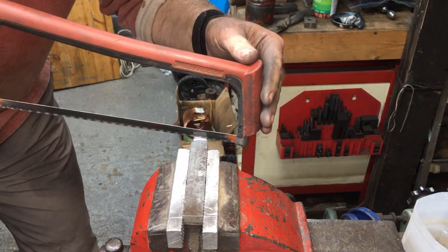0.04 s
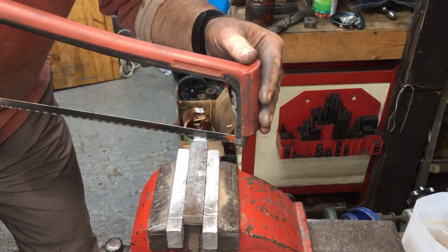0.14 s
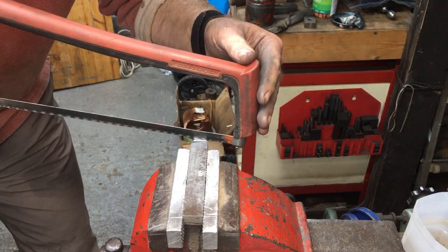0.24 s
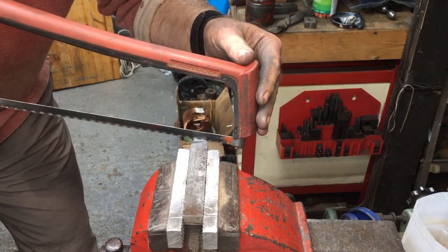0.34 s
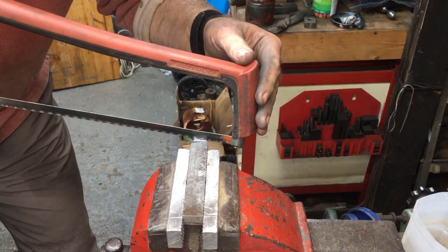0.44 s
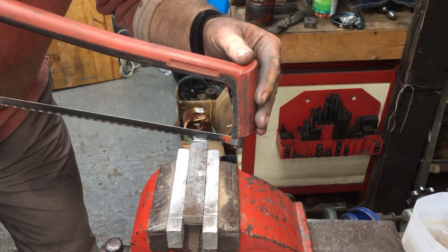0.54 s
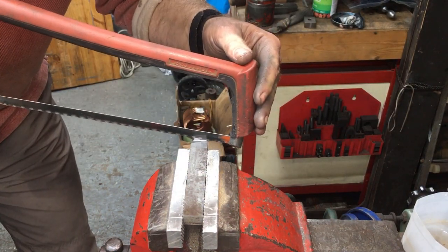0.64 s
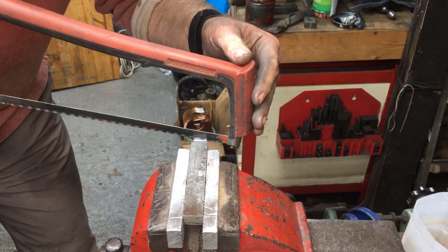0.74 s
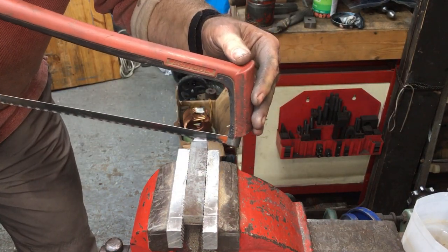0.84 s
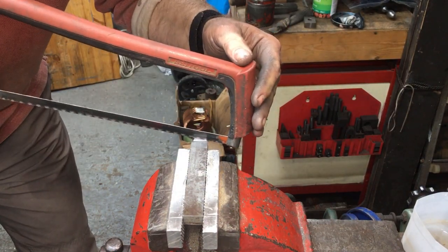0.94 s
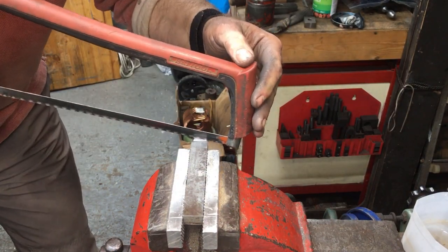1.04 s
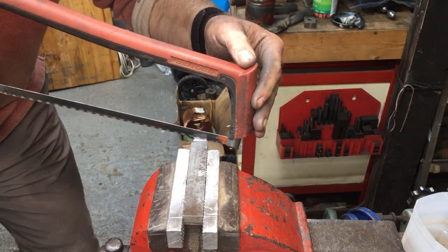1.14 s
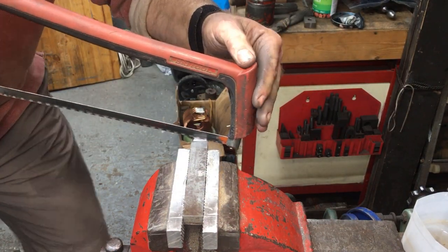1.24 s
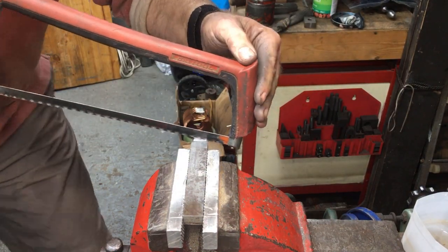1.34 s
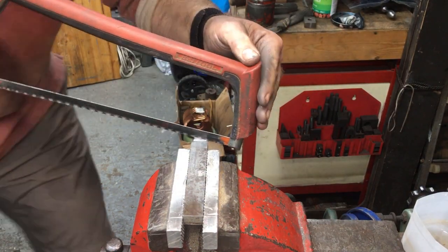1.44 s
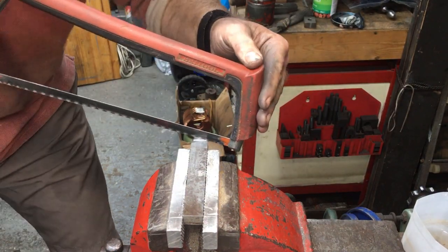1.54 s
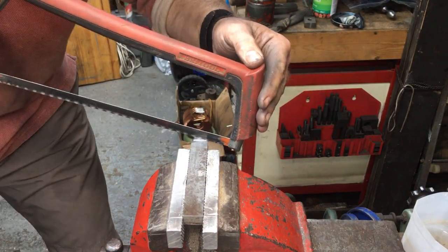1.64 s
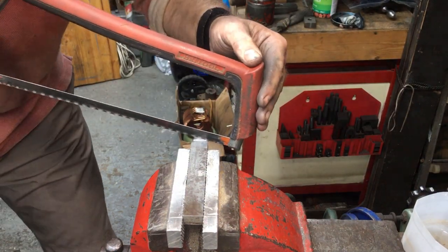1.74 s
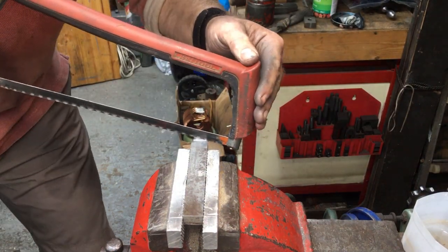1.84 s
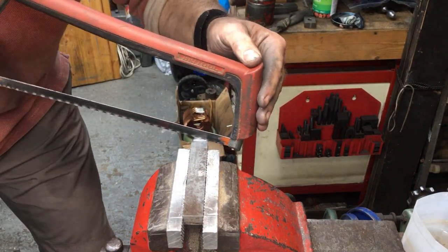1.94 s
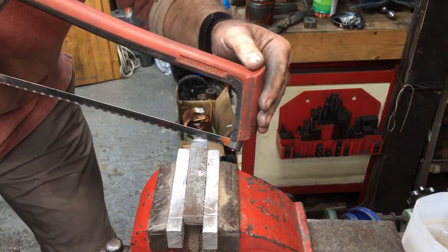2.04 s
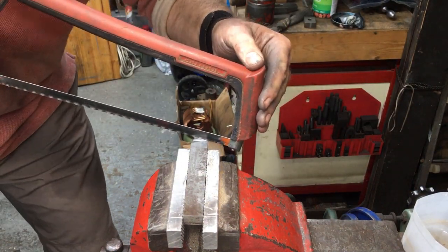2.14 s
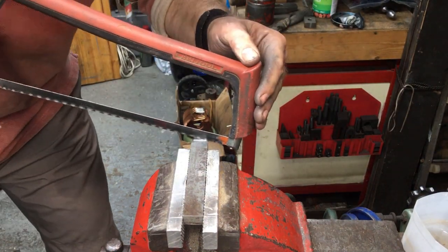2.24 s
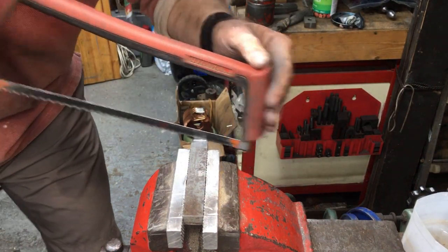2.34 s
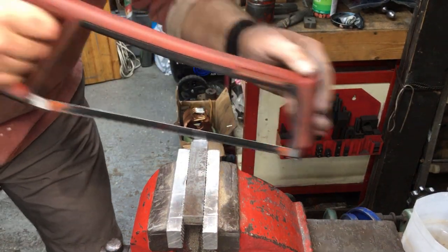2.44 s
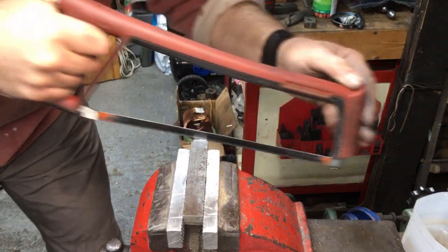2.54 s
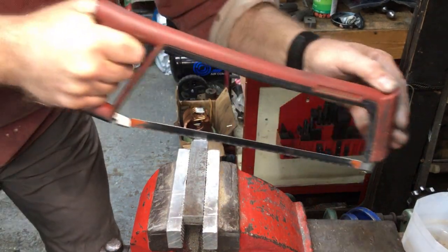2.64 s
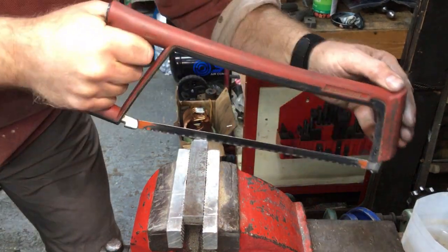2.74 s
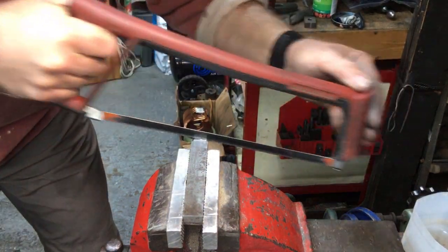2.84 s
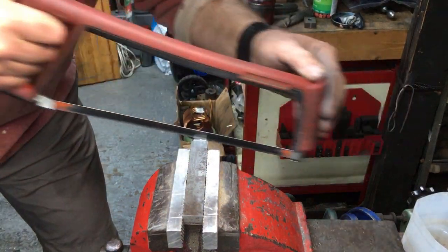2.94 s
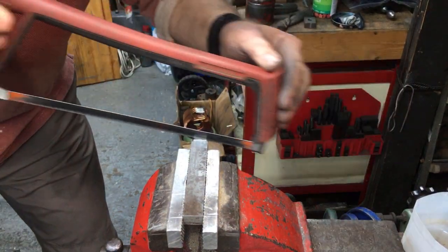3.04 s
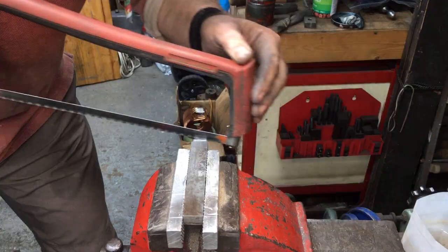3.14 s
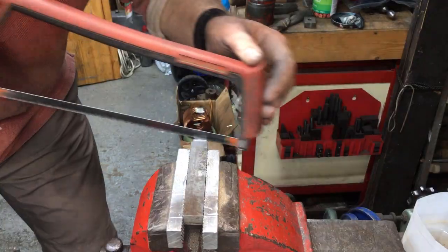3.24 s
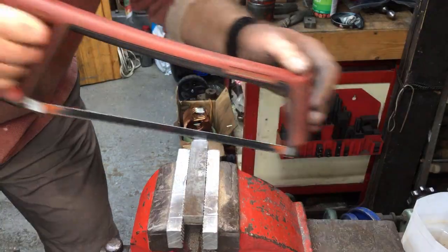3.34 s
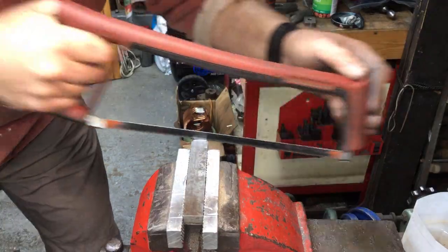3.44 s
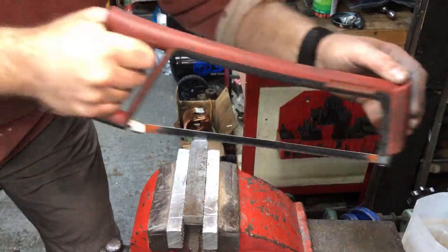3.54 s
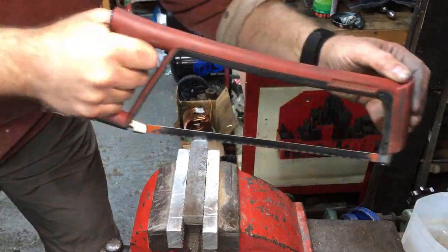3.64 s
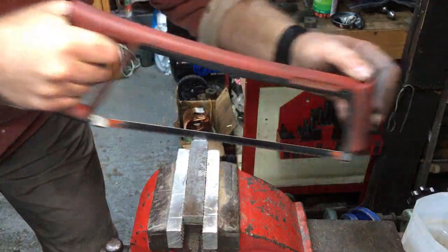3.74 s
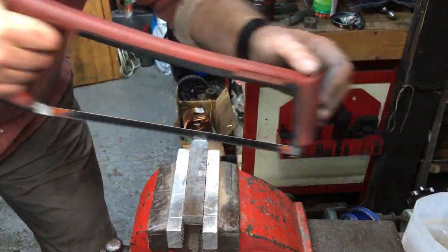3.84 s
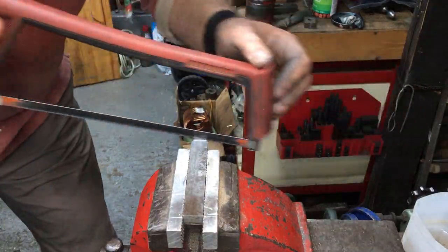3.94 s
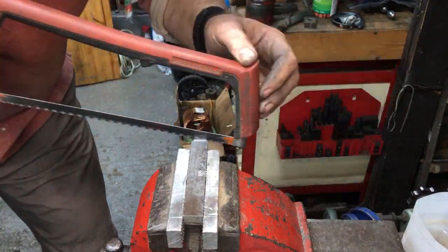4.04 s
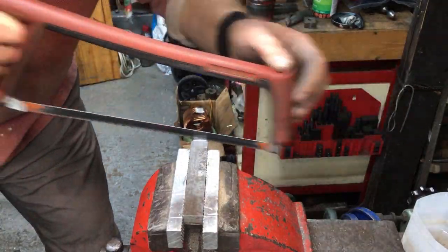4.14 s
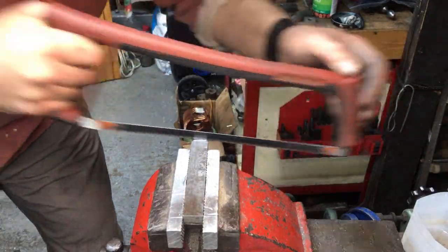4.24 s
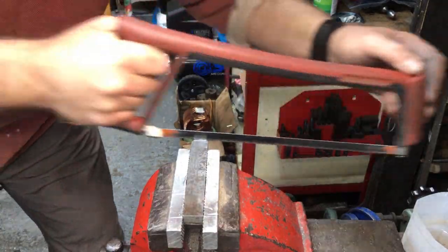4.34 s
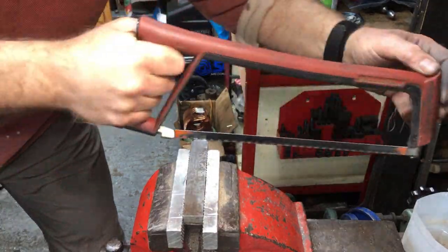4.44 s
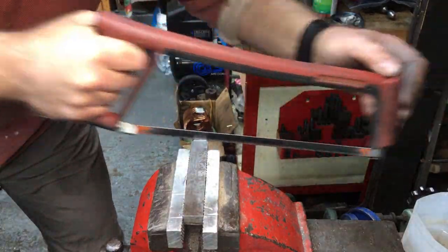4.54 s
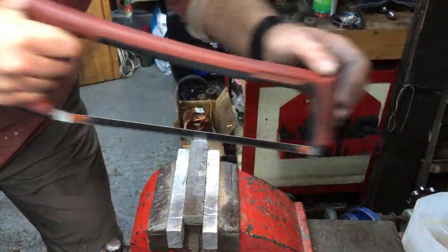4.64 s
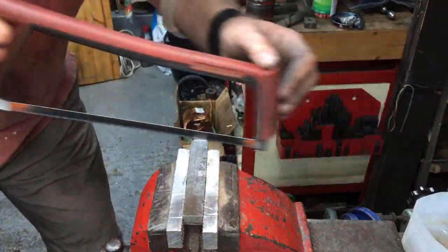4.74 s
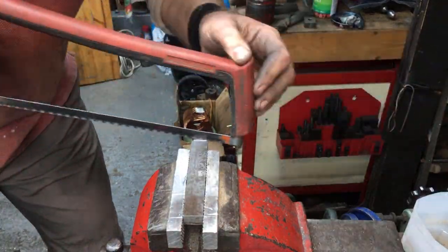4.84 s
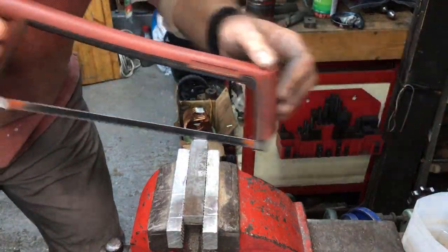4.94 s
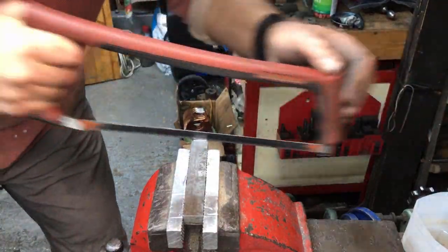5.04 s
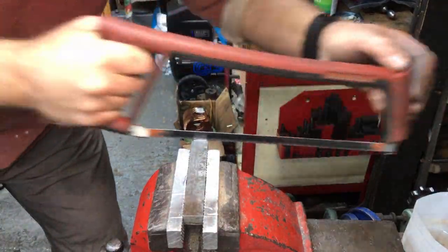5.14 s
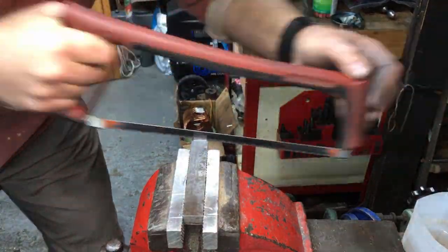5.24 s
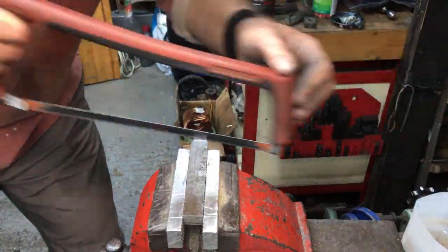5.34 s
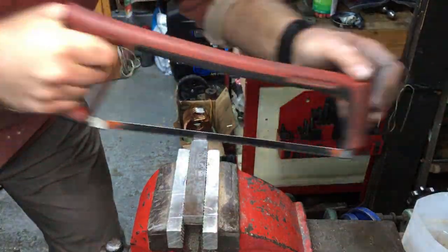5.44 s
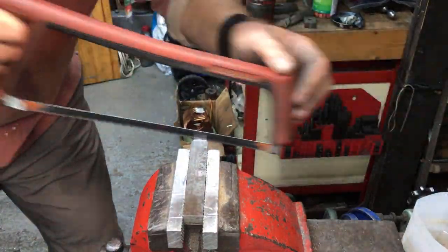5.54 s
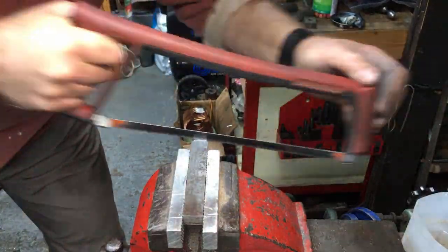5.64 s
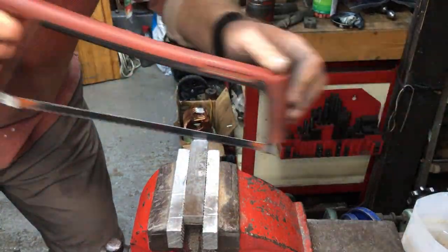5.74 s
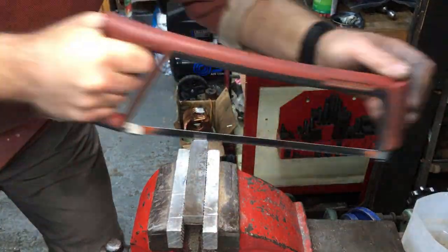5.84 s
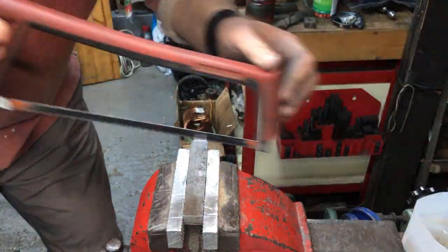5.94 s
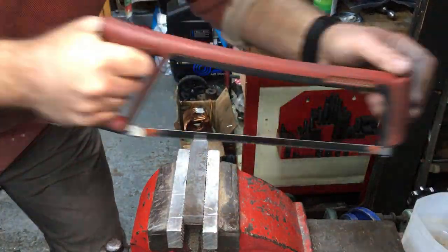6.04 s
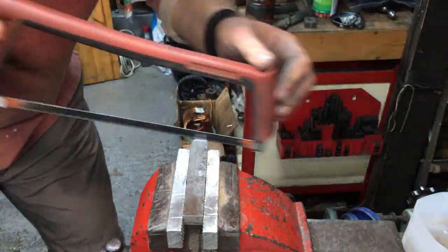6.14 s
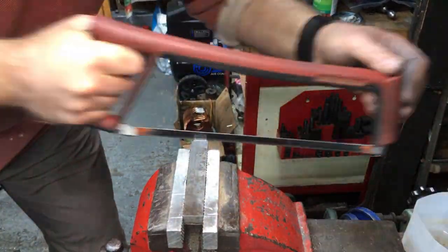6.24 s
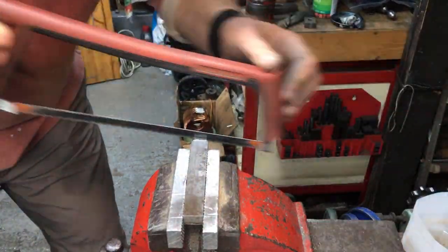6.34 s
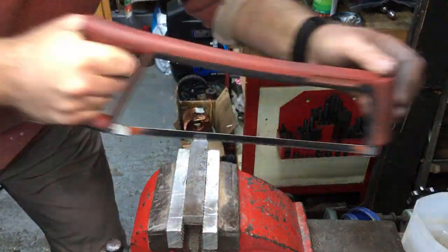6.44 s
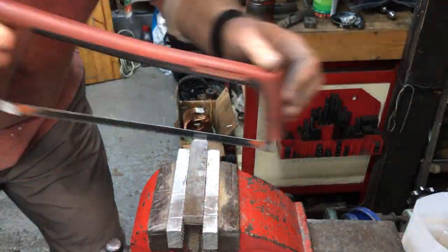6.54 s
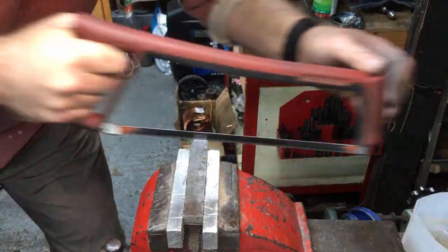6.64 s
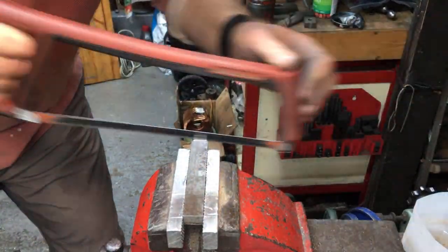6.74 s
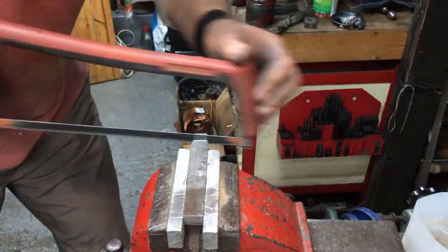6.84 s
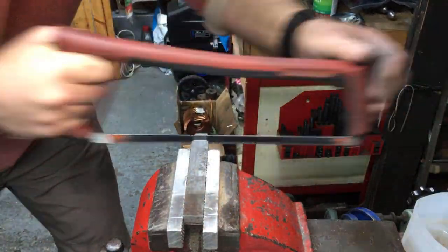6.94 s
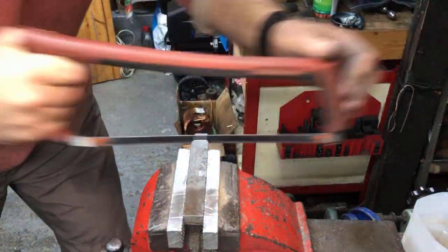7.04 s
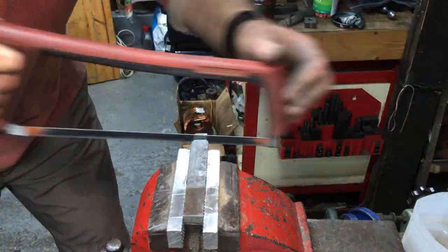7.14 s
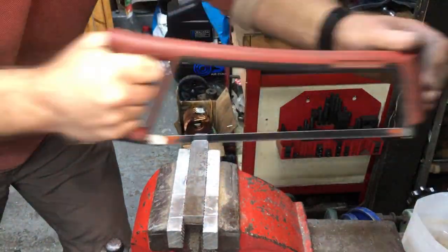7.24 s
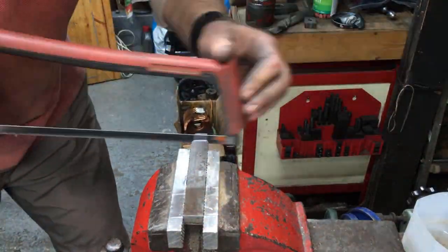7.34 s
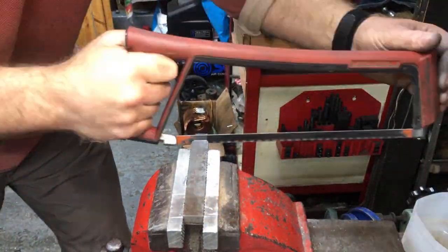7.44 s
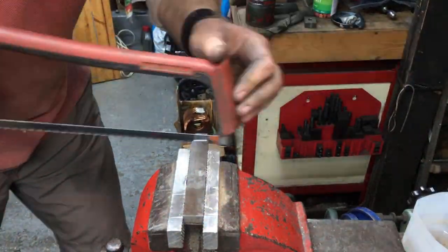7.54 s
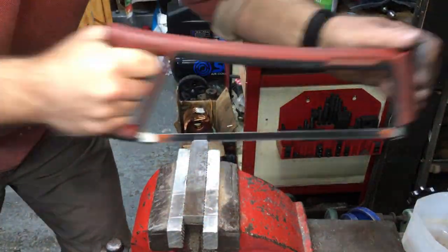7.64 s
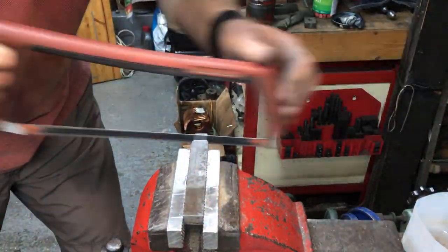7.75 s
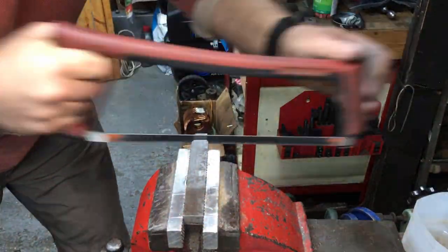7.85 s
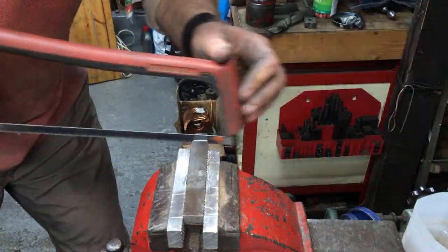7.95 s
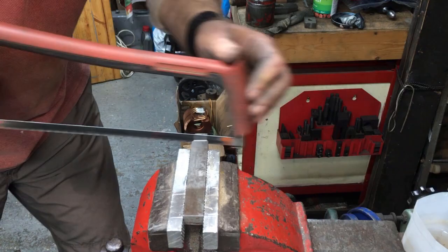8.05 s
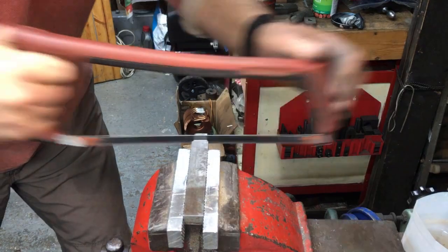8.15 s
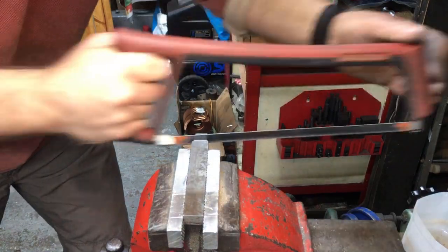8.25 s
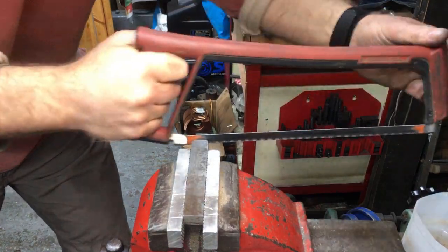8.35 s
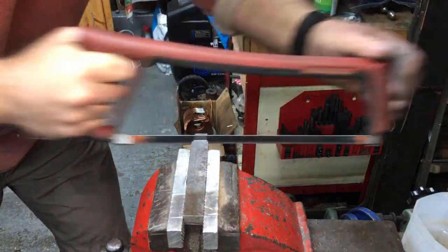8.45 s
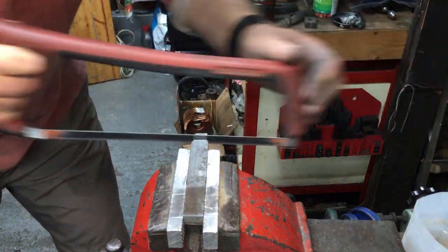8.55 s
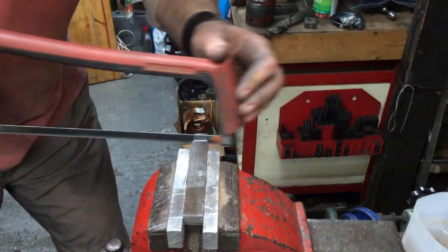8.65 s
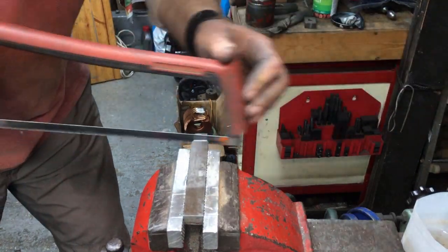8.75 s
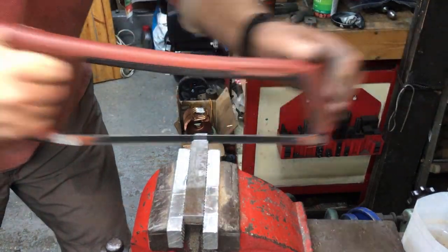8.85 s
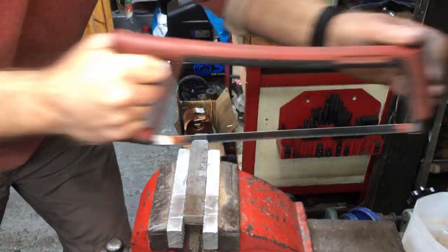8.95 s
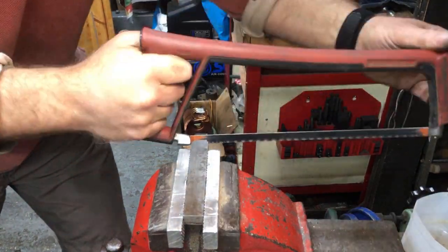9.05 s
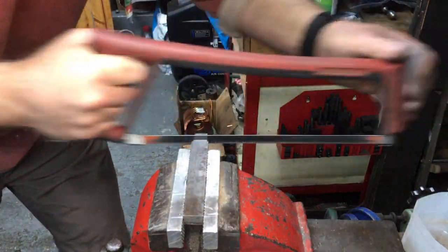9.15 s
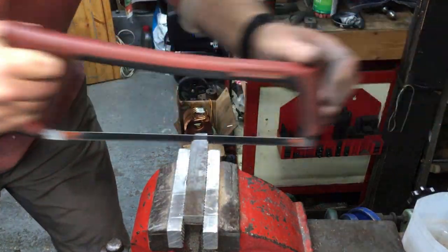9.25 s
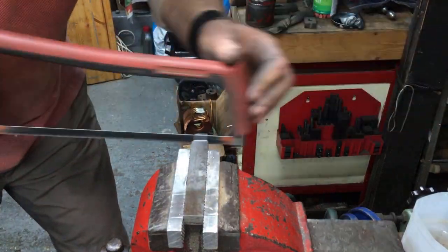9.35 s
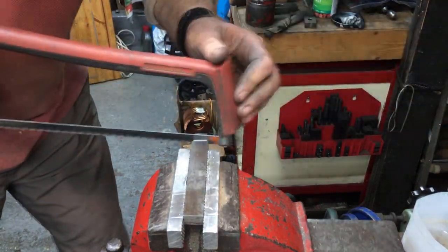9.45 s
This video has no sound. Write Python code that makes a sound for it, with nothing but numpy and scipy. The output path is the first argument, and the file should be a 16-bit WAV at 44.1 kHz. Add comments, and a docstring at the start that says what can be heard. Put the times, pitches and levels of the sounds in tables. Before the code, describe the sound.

Faint, low workshop air runs throughout. At 0 s a hacksaw blade taps the clamped steel with a soft low thud; light gritty drags follow around 0.4 and 0.8 s. From 1.3 to 2.3 s come more taps, thin scrapes, low bench thuds and a run of very faint ticks. At about 2.35 s sawing starts: harsh, toothy push and pull strokes of roughly 0.45 s each, loud at mid-stroke and dipping at the turns, with gliding blade resonances, occasional hard snags and brief faint singing tones. From 5.25 to 7.9 s the sound is time-lapsed: about ten strokes per second, four times higher, a frantic hissy zipping that gradually brightens. Normal speed returns near 7.9 s with about four slower, brighter, fuller strokes, short squeaks near 8.2, 8.6 and 8.9 s, and a final low thud as cutting stops near 9.5 s. Close, dry, with a short dull room tail.

```python
"""Faint workshop air; a hacksaw taps, drags and thuds on a steel piece in a vise, with a short run of faint ticks.
Even strokes follow: tooth clicks, rub noise and random chips drive resonances of blade, frame and bench.
The middle strokes play as a time-lapse by skipping samples, four times as fast and as high.
The cut deepens and brightens there; normal strokes then end the job. Short gliding sines sing now and then."""
import sys
import numpy as np
from scipy import signal
from scipy.fft import rfft, irfft
from scipy.io import wavfile
from scipy.ndimage import uniform_filter1d

SR = 44100
rng = np.random.default_rng(int(sys.argv[2]) if len(sys.argv) > 2 else 0)


def dump(signal):
    """Clip the signal to [-1, 1] and save it as 16-bit WAV at the path in sys.argv[1]."""
    limited = np.clip(np.atleast_2d(signal).T, -1, 1)
    pcm = np.round(limited * 32767).astype(np.int16)
    wavfile.write(sys.argv[1], SR, pcm)


N = 418509

# Columns t are listening time; rise, fade, half length and f are as at the bench, before the time-lapse.
# workshop air, relative spectrum: f/Hz, density/dB
AIR_SPECTRUM = [(18, -20), (30, -11), (52, 4), (92, -3.5), (135, 1.5), (263, -16.5), (399, -9.5),
                (518, -18.5), (1230, -21.5), (4910, -32.5), (15500, -30)]
# workshop air: t/s, level/dB
AIR_LEVELS = [(0, -63), (1.2, -62), (1.4, -59), (2.3, -57), (9.49, -57)]
# weight of the saw rocking the bench: t/s, level/dB
BENCH_THUDS = [(0.033, -48.5), (.776, -46.5), (1.403, -45), (1.879, -38), (2.37, -43), (3.23, -46),
               (4.36, -40.5), (5.191, -38), (8.03, -40.5), (8.71, -39), (9.45, -37)]
# blade tapping the work: t/s, drive/dB
BLADE_TAPS = [(0.023, -37), (0.114, -51.5), (0.312, -60), (1.38, -43), (1.466, -47.5), (2.1128, -47.5)]
# light drags over the work: peak t/s, rise/s, drive/dB, treble offset/dB
BLADE_DRAGS = [(.365, 0.041, -54, 1), (.465, 0.044, -46.5, -6), (0.774, 0.048, -39.5, -4),
               (1.307, 0.031, -50.5, 13.5), (1.676, 0.083, -50, 12), (1.873, 0.015, -46.5, 12),
               (1.968, 0.018, -40, 1.5), (2.32, 0.069, -47, 1.5)]
# resting saw, relative broad colour: f/Hz, level/dB
RESTING_COLOUR = [(100, -15), (900, -7.5), (1700, -9.5), (3000, -2.5), (5000, -8), (15000, -13)]
# resting saw, modes: f/Hz, width/Hz, lift/dB
RESTING_MODES = [(606, 70, 10), (1800, 65, 16.7), (2030, 67, 20.5), (3850, 70, 15), (6300, 95, 14)]
# blade or vise singing: t/s, f/Hz, level/dB, half length/s, glide/(octaves/s)
SINGING_TONES = [(2.56, 342, -41.5, 0.023, -11.5), (3.117, 615, -43.5, 0.052, 0),
                 (3.46, 1494, -36, 0.028, 1), (4.762, 2100, -33, 0.025, -0.5),
                 (5.941, 625, -43.5, 0.051, -0.5), (5.935, 1855, -33, 0.052, 1.5),
                 (8.195, 1820, -29, 0.025, 3.5), (8.241, 3250, -28, 0.011, -5),
                 (8.325, 475, -32, 0.038, -1.5), (8.555, 1400, -32, 0.013, 7),
                 (8.599, 2082, -28, 0.01, -0.5), (8.937, 3675, -19, 0.017, 0), (9.03, 480, -37, 0.045, 0.5),
                 (9.27, 1440, -29, .018, 4.5)]
# teeth catching on the edge of the cut: t/s, drive/dB
TOOTH_SNAGS = [(2.38, -20), (2.812, -30.5), (2.863, -21.5), (3.015, -18), (3.279, -36), (3.727, -22),
               (3.772, -16.5), (5.478, -12), (6.103, -14.5), (7.963, -17), (8.925, -16.5)]
# teeth losing grip: t/s, half length/s
TOOTH_SKATES = [(5.935, 0.067), (8.246, 0.0048), (9.009, 0.0087)]
# strokes, each lasting until the next: start t/s, pressure/dB, share of stroke at top speed/1
SAW_STROKES = [(2.345, -21.5, 0.4), (2.782, -20.5, 0.47), (3.237, -22.3, 0.5), (3.664, -23.5, 0.48),
               (4.091, -19, 0.54), (4.485, -21.5, 0.43), (4.914, -20, 0.57), (5.253, -19.5, 0.44),
               (5.356, -20.5, 0.47), (5.451, -20, 0.46), (5.559, -20.5, 0.44), (5.652, -20, 0.47),
               (5.76, -19.5, 0.42), (5.859, -19, 0.5), (5.965, -21, 0.48), (6.057, -20.5, 0.48),
               (6.167, -20.5, 0.47), (6.258, -21.5, 0.44), (6.365, -20.5, 0.47), (6.454, -20.5, 0.49),
               (6.562, -20, 0.55), (6.647, -20, 0.53), (6.758, -21.5, 0.42), (6.847, -18.5, 0.57),
               (6.949, -18.5, 0.5), (7.041, -20.5, 0.5), (7.126, -20.5, 0.48), (7.218, -19, 0.49),
               (7.306, -19.5, 0.48), (7.399, -19, 0.47), (7.483, -20.5, 0.47), (7.579, -19, 0.46),
               (7.667, -20.5, 0.45), (7.76, -19.5, 0.45), (7.845, -20, 0.47), (8.041, -19.5, 0.49),
               (8.376, -20.5, 0.43), (8.741, -19.5, 0.51), (9.078, -21, 0.49)]
# bending modes of half the blade, work at mid-blade: f/Hz, width/Hz, lift/dB
SPAN_MODES = [(400, 25, 6), (1100, 30, 13), (2160, 60, 5), (3560, 140, 2)]
# friction ringing of the frame: low f/Hz, high f/Hz
FRAME_BANDS = [(1780, 2150), (3750, 4250)]
# saw and work, relative broad colour: f/Hz, shallow cut/dB, deep cut/dB
CUT_COLOUR = [(55, -14.5, -27), (110, -12, -8), (200, -15, -13.5), (413, -18, -15.5), (780, -21.5, -17),
              (1270, -10.5, -8), (1780, -5.5, -6), (2670, -8, -3), (3060, -6.5, -5.5), (3370, -12, -7),
              (3610, -6, -2.1), (4480, -8.5, -8), (4620, -11, -7.5), (5900, -6.5, 0), (8100, -9.5, -8),
              (8870, -6, -1), (16000, -9, -2)]
# bench, vise, frame and blade modes: f/Hz, width/Hz, shallow lift/dB, deep lift/dB
CUT_MODES = [(132, 4.9, 14, 13), (165.4, 11, 10.5, 7.5), (199, 10.4, 12.5, 12.5), (359, 18, 17, 15.5),
             (475, 15, -18, 4), (577, 57, 10, 9.5), (643, 33, 12.5, 9.5), (935, 32, 9, 10.5),
             (1036.4, 10.7, 14, 12.5), (1480, 84, 8, 5), (1823, 39, 9.5, 6), (1952, 46, 8, 2.5),
             (2086, 23, 6, 5), (2080, 8.8, -1, 7), (2366, 29, 9, 11.5), (3017, 81, 6, 7.5),
             (3274, 40, 13, 11), (3682, 38, -10, 9), (3805, 85, 9.5, 9.5), (4028, 93, 13.5, -14),
             (4460, 110, 9.5, 7)]

TICK_FROM_S, TICK_EVERY_S, TICK_COUNT = 1.5, .0644, 14
THUD_RISE_S, THUD_FADE_S, THUD_BAND_HZ = 0.014, 0.074, (147, 234)
TAP_RISE_S, TAP_FADE_S, TAP_TOP_HZ = 0.00035, 0.025, 5140
TAP_CRACK_DB, TAP_CRACK_S = 4, 0.0019   # lift over the tap, fade
DRAG_FADE_S = 0.024
SCRAPE_HZ, SCRAPE_WIDTH_HZ = 3520, 1100   # open rasp of lightly sliding teeth
SNAG_RISE_S, SNAG_FADE_S = .0015, 0.012
BREAKAWAY_LAG_S, BREAKAWAY_FADE_S = 0.0493, 0.03   # lag after the turn
BREAKAWAY_DB, BREAKAWAY_SPREAD_DB = -33, 1.5
LAST_STROKE_END_S = 9.48
TEETH_PER_STROKE = 320   # nominal
SKATE_DIP_DB = -25.5
JUDDER_DB = 1.8   # spread
DEEPENS_FROM_S, DEEPENS_TO_S = 5.87, 7.4
CUTOFF_HZ = 15750
LAPSE_START, LAPSE_END, SPEED_UP = round(5.25 * SR), round(7.915 * SR), 4   # samples, samples, factor
SKIPPED = (SPEED_UP - 1) * (LAPSE_END - LAPSE_START)
WORK = np.arange(N + SKIPPED) / SR   # s at the bench


def from_db(db):
    """Decibels to gain."""
    return np.exp(np.asarray(db) * (np.log(10) / 20))


def rms_one(x):
    """Scale to unit rms."""
    return x / np.sqrt(np.mean(x ** 2) + 1e-20)


def bench_time(s):
    """Listening time to time at the bench."""
    start_s, end_s = LAPSE_START / SR, LAPSE_END / SR
    return s + (SPEED_UP - 1) * (np.clip(s, start_s, end_s) - start_s)


def band(x, hz, kind, order=2):
    """Butterworth filter."""
    return signal.sosfilt(signal.butter(order, hz, kind, fs=SR, output="sos"), x + 1e-18)


def noise():
    """White noise for the whole job."""
    return rng.standard_normal(len(WORK))


def drift(hz):
    """Low-passed noise of unit rms, computed at a reduced rate."""
    step = 16
    slow = band(rng.standard_normal(len(WORK[::step])), min(hz * step, .45 * SR), "low")
    return np.interp(WORK, WORK[::step], rms_one(slow))


def swells(rows):
    """Summed envelopes of rows (bench s, dB, rise s, fade s): a rounded rise, then an exponential fade."""
    out = np.zeros(len(WORK))
    for at, db, rise, fade in rows:
        near = slice(*np.searchsorted(WORK, [at - 4 * rise, at + 10 * fade]))
        t = WORK[near] - at
        out[near] += from_db(db) * np.exp(-np.where(t < 0, (t / rise) ** 2, t / fade))
    return out


def response(hz, db, modes=()):
    """Minimum-phase impulse response of a colour with resonances, and its rms gain at 1-5 kHz."""
    size = 2 ** 14
    f = np.fft.rfftfreq(size, 1 / SR) + 1
    peaks = 1 + sum(from_db(lift) ** 2 / (1 + (2 * (f - centre) / width) ** 2)
                    for centre, width, lift in modes)
    gain = from_db(np.interp(np.log(f), np.log(hz), db)) * np.sqrt(peaks)
    # folded cepstrum makes it causal
    cepstrum = irfft(np.log(gain))
    cepstrum[0] /= 2
    impulse = irfft(np.exp(rfft(2 * cepstrum[:size // 2], size)))
    return impulse, np.sqrt(np.mean(gain[(f > 1000) & (f < 5000)] ** 2))


def gliding_resonance(x, hz, width):
    """Resonance of gain 1 with a moving centre: shift to 0 Hz, low-pass, shift back."""
    cycles = np.cumsum(hz) / SR
    turn = 2 * np.pi * (cycles - np.floor(cycles)).astype(np.float32)
    r = np.exp(-np.pi * width / SR)
    return 2 * sum(wave * signal.lfilter([1 - r], [1, -r], x * wave)
                   for wave in (np.cos(turn), np.sin(turn)))


def room_air():
    """Coloured noise of slowly changing level."""
    s, db = np.transpose(AIR_LEVELS)
    impulse, _ = response(*np.transpose(AIR_SPECTRUM))
    air = rms_one(signal.oaconvolve(noise(), impulse)[:len(WORK)])
    return air * from_db(np.interp(WORK, bench_time(s), db))


def faint_ticks(level_db=-57.0, centre_hz=1340, rise_s=0.0063, fade_s=0.014):
    """A short run of soft noise bursts, unevenly spaced."""
    rows = []
    for k in range(TICK_COUNT):
        at = TICK_FROM_S + TICK_EVERY_S * (k + rng.uniform(-0.43, 0.4))
        rows.append((at, level_db + 2 * rng.standard_normal(), rise_s, fade_s))
    return swells(rows) * rms_one(band(noise(), [centre_hz * .85, centre_hz * 1.2], "band"))


def thuds():
    """The saw's weight rocks the bench, at rest and while sawing: bursts of low noise."""
    envelope = swells([(bench_time(s), db, THUD_RISE_S, THUD_FADE_S) for s, db in BENCH_THUDS])
    return envelope * rms_one(band(noise(), THUD_BAND_HZ, "band"))


def taps():
    """Force of blade on work: a short crack over a slower noise burst."""
    rows = []
    for s, db in BLADE_TAPS:
        rows.append((bench_time(s), db + TAP_CRACK_DB, TAP_RISE_S, TAP_CRACK_S))
        rows.append((bench_time(s), db, TAP_RISE_S, TAP_FADE_S))
    return swells(rows) * band(noise(), TAP_TOP_HZ, "low", order=1)


def drags(grit_db=4.5, hiss_db=-17):
    """Light sliding: gritty noise as a dull force and as a directly heard, resonant hiss."""
    grit = rms_one(noise() * from_db(grit_db * drift(310)))
    dull, bright = band(grit, 2000, "low", order=3), band(grit, 2000, "high")
    rasp = gliding_resonance(bright, np.full(len(WORK), SCRAPE_HZ), SCRAPE_WIDTH_HZ)
    force_rows = [(bench_time(s), db, rise, DRAG_FADE_S) for s, rise, db, _ in BLADE_DRAGS]
    hiss_rows = [(bench_time(s), db + treble_db, rise, DRAG_FADE_S)
                 for s, rise, db, treble_db in BLADE_DRAGS]
    return dull * swells(force_rows), from_db(hiss_db) * (bright + 2 * rasp) * swells(hiss_rows)


def handling():
    """Taps and drags excite the resting saw's modes; hiss and thuds add directly."""
    drag_force, hiss = drags()
    impulse, gain = response(*np.transpose(RESTING_COLOUR), RESTING_MODES)
    resting_saw = signal.oaconvolve(taps() + drag_force, impulse / gain)[:len(WORK)]
    return resting_saw + hiss + thuds()


def singing(waver=0.007924):
    """Teeth lock on to a resonance: short wavering sines, some gliding as the blade travels."""
    out, wobble = np.zeros(len(WORK)), waver * np.cumsum(drift(88.2)) / SR
    for s, hz, db, half, glide in SINGING_TONES:
        at = bench_time(s)
        near = slice(*np.searchsorted(WORK, [at - 3 * half, at + 3 * half]))
        t = WORK[near] - at
        cycles = hz * (np.cumsum(2 ** (glide * t)) / SR + wobble[near])
        envelope = from_db(db) * np.sqrt(2) * np.exp(-(t / half) ** 2)
        out[near] += envelope * np.sin(2 * np.pi * cycles)
    return out


def stroke_turns():
    """Bench times of the stroke starts and of the last end."""
    return bench_time(np.array([s for s, _, _ in SAW_STROKES] + [LAST_STROKE_END_S]))


def catching():
    """Force of catching teeth: a small jerk after each stroke start, and a few hard snags."""
    jerks = [(at + BREAKAWAY_LAG_S, BREAKAWAY_DB + BREAKAWAY_SPREAD_DB * rng.standard_normal(),
              SNAG_RISE_S, BREAKAWAY_FADE_S) for at in stroke_turns()[:-1]]
    snags = [(bench_time(s), db, SNAG_RISE_S, SNAG_FADE_S) for s, db in TOOTH_SNAGS]
    return swells(jerks + snags) * noise()


def motion(reach_spread=0.0996):
    """To-and-fro of uneven reach: speed 0-1, place (0 back, 1 out, nominal), teeth per second, pressure."""
    turns, (_, pressure_db, fastest) = stroke_turns(), np.transpose(SAW_STROKES)
    k = np.clip(np.searchsorted(turns, WORK) - 1, 0, len(turns) - 2)
    length = np.diff(turns)[k]
    # warp puts top speed near its set share of the stroke
    warp = np.log(.5) / np.log(np.clip(fastest, .1, .9))
    progress = np.clip((WORK - turns[k]) / length, 0, 1) ** warp[k]
    speed = np.abs(np.sin(np.pi * progress))
    tooth_hz = TEETH_PER_STROKE / length * np.pi / 2 * speed

    ends = np.arange(len(turns)) % 2 + reach_spread * rng.standard_normal(len(turns))
    place = ends[k] + np.diff(ends)[k] * (.5 - .5 * np.cos(np.pi * progress))
    # normal speed resumes on a pull
    place = np.where(WORK < bench_time(LAPSE_END / SR), place, 1 - place)

    skating = sum(np.abs(WORK - bench_time(at)) < half for at, half in TOOTH_SKATES)
    dip_db = SKATE_DIP_DB * uniform_filter1d(skating * 1., size=200)
    onset = np.clip((WORK - turns[0]) / 0.032, 0, 1) ** 2
    return speed, place, tooth_hz, from_db(pressure_db[k] + dip_db) * onset


def teeth(tooth_hz, jitter=.04, uneven_db=-1.5, bite_db=-8.5, chip_db=-8.5,
          chips_per_tooth=0.79, chip_spread_db=3.0):
    """Each tooth bites with a click and rubs on; chips break off at random."""
    passed = np.cumsum(tooth_hz * (1 + jitter * drift(60))) / SR
    bites = np.diff(np.floor(passed), prepend=0) * from_db(uneven_db * noise())
    rub = noise() * np.exp(-1.5 * (passed % 1))
    breaks = rng.random(len(WORK)) < chips_per_tooth * tooth_hz / SR
    chip_level_db = chip_spread_db * np.minimum(rng.exponential(1, len(WORK)), 4)
    chips = breaks * np.sign(noise()) * from_db(chip_level_db)
    clicks = from_db(bite_db) * rms_one(band(bites, 370, "high"))
    return rms_one(rms_one(rub) + clicks + from_db(chip_db) * rms_one(chips))


def blade(force, place, reach=.42, middle=.58, wander=0.02025, flare_db=4.5):
    """The work splits the blade in two spans; modes sink as a span lengthens, rise as it shortens."""
    # no two strokes sit alike
    offset = np.clip(reach * (place - middle) + wander * drift(10.12), -.45, .45)
    out = force
    for span in (.5 + offset, .5 - offset):
        for hz, width, lift_db in SPAN_MODES:
            pitch = hz * (.5 / span) ** 2
            # the cut damps high modes
            undamped = 1 / (1 + np.square(np.square(pitch / 5200)))
            # friction feeds each mode by fits and starts
            flare = from_db(lift_db + flare_db * np.minimum(drift(14.0), 1.5))
            out = out + flare * undamped * gliding_resonance(force, pitch, width)
    return rms_one(out)


def frame_ring():
    """Friction ringing of the frame: noise in two bands."""
    return rms_one(sum(band(noise(), edges, "band") for edges in FRAME_BANDS))


def cutting(idle=0.0088, low_power=0.085, moan_power=0.45, mid_power=1.29, high_power=1.4,
            ring_power=0.97, low_db=-3, moan_db=-1, mid_db=-1, ring_db=-15, high_db=0.0):
    """Cutting force by band: hiss needs speed, low thrum lasts through the turns."""
    speed, place, tooth_hz, pressure = motion()
    # uneven bite: the rasp comes in small bursts
    judder = from_db(JUDDER_DB * rms_one(band(noise(), [25, 160], "band")))
    grind = blade(teeth(tooth_hz), place) * judder
    effort = idle + (1 - idle) * speed
    low = band(grind, 330, "low", order=3)
    moan = band(grind, [330, 640], "band", order=3)
    rest = band(grind, 960, "high", order=3)
    mid = band(rest, 5000, "low", order=3)
    high = band(rest, 5000, "high", order=3)
    ring = frame_ring() * judder
    layers = [(low, low_db, low_power), (moan, moan_db, moan_power), (mid, mid_db, mid_power),
              (ring, ring_db, ring_power), (high, high_db, high_power)]
    return pressure * sum(from_db(db) * force * effort ** power for force, db, power in layers) + catching()


def steel(force, deep):
    """Saw, work and bench answer a force, in a shallow (0) or deep (1) cut."""
    colour, modes = np.array(CUT_COLOUR), np.array(CUT_MODES)
    impulse, gain = response(colour[:, 0], colour[:, 1 + deep], modes[:, [0, 1, 2 + deep]])
    radiated = band(force, 45, "high", order=3)
    return signal.oaconvolve(radiated, impulse / gain)[:len(WORK)]


def workshop(x, wet_db=-8.5, t60_s=0.095, wall_hz=6000):
    """A cluttered room adds a short, dull, diffuse tail of decaying noise."""
    t = WORK[:SR // 2]
    decay = rng.standard_normal(len(t)) * from_db(-60 * t / t60_s) * (t > .003)
    tail = band(decay, wall_hz, "low", order=1)
    return x + from_db(wet_db) * signal.oaconvolve(x, tail / np.linalg.norm(tail))[:len(x)]


def time_lapse(x, lapse_db=0.0):
    """Skipping samples raises every pitch and folds the treble down into a broad hiss."""
    resume = LAPSE_END + SKIPPED
    fast = band(x, CUTOFF_HZ, "low", order=6)[LAPSE_START:resume:SPEED_UP]
    return np.concatenate([x[:LAPSE_START], from_db(lapse_db) * fast, x[resume:]])


def scene():
    """Crossfade from shallow to deep cut, add the rest; both channels alike."""
    force = cutting()
    depth = np.interp(WORK, bench_time(np.array([DEEPENS_FROM_S, DEEPENS_TO_S])), [0, 1])
    cut = steel(force * (1 - depth), 0) + steel(force * depth, 1)
    saw = cut + singing() + handling()
    background = room_air() + faint_ticks()
    return np.tile(time_lapse(workshop(saw) + background), (2, 1))


def record(dry):
    """Steep elliptic low-pass."""
    return signal.sosfilt(signal.ellip(12, .2, 80, CUTOFF_HZ, fs=SR, output="sos"), dry)


dry = scene()
out = record(dry)
dump(out)
```